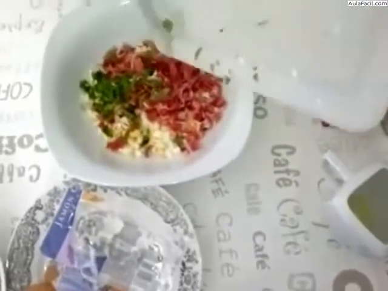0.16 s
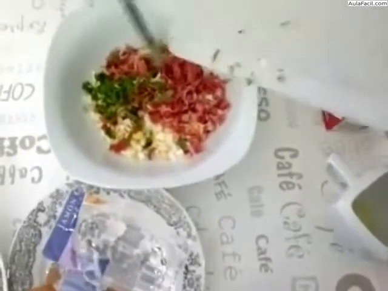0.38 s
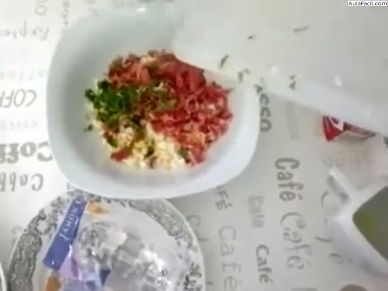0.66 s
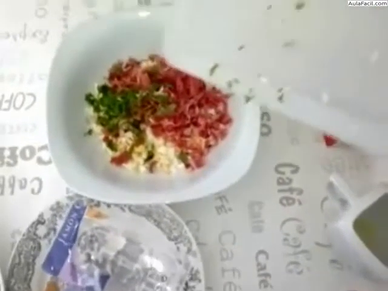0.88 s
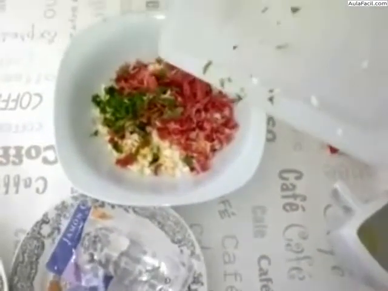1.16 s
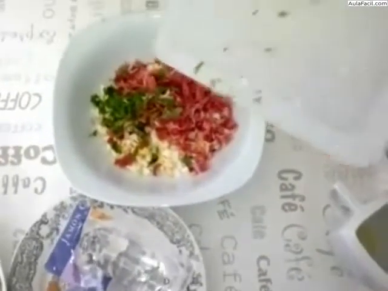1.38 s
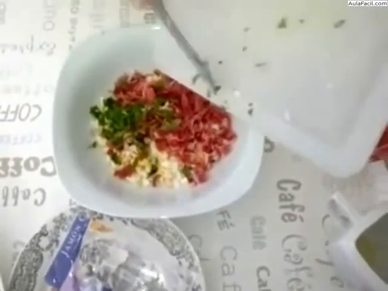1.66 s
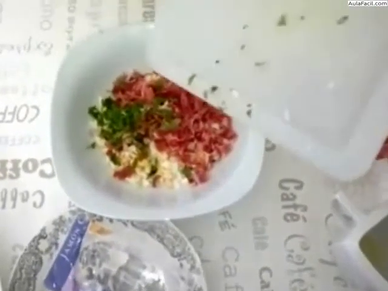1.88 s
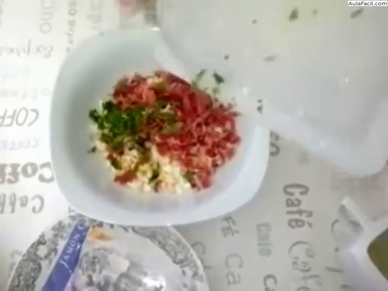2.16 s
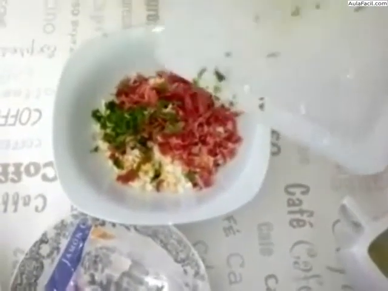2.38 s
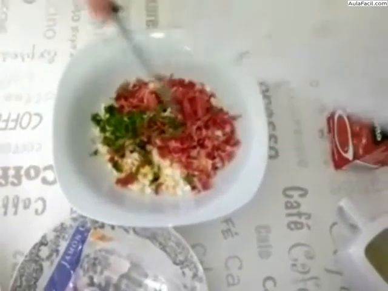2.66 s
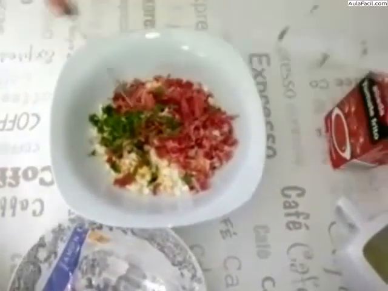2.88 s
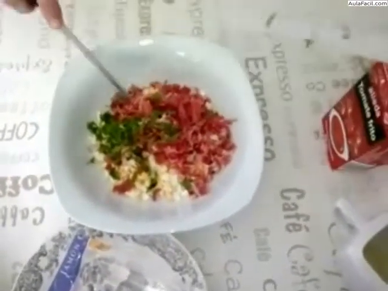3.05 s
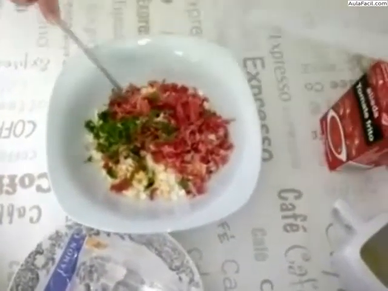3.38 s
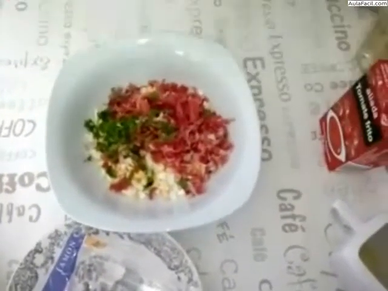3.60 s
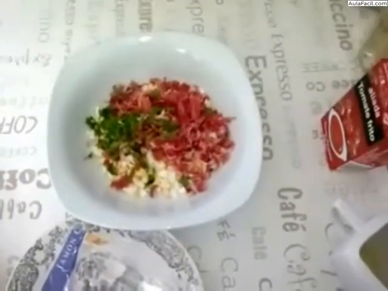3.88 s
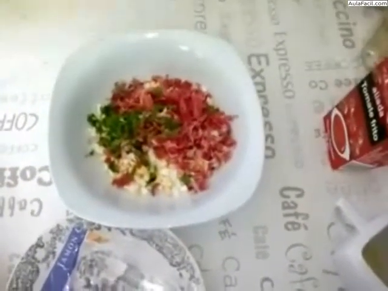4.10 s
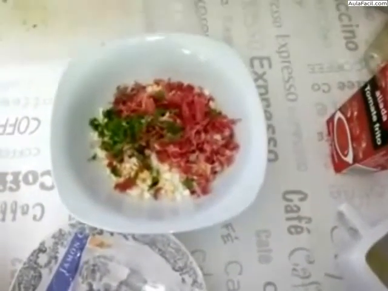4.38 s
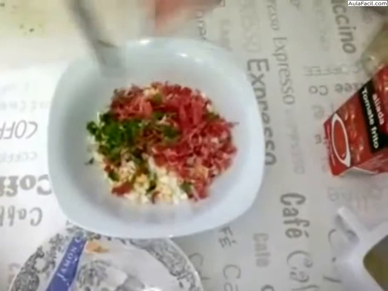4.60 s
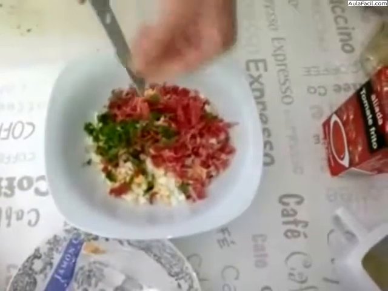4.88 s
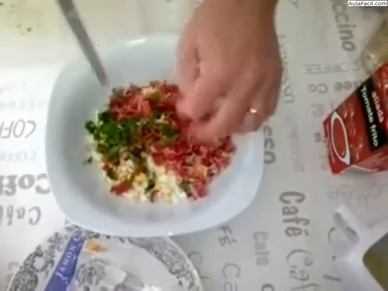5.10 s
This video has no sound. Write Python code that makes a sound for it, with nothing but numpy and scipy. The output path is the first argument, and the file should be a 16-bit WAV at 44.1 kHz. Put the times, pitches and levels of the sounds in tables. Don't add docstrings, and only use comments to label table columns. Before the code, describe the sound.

A knife scrapes a plastic board in eight rough strokes, then the board clatters down among crockery and cutlery in a small kitchen.

```python
import sys
import numpy as np
from scipy import signal
from scipy.fft import rfft, irfft
from scipy.io import wavfile
from scipy.ndimage import uniform_filter1d

SR = 44100
rng = np.random.default_rng(int(sys.argv[2]) if len(sys.argv) > 2 else 0)


def amp(db):
    return 10 ** (np.asarray(db, float) / 20)


def write(x):
    x = np.atleast_2d(x).T
    wavfile.write(sys.argv[1], SR, np.round(np.clip(x, -1, 1) * 32767).astype(np.int16))


N = 231182

# landing in seconds, build-up in seconds, hold in seconds,
# pressure in dB, landing level under that pressure in dB.
STROKES = [
    (0.0, 0.075, 0.014, -22.5, 1),
    (0.428, 0.019, 0.043, -26.5, -8.5),
    (0.763, 0.037, 0.024, -22, -5.5),
    (1.045, 0.007, 0.018, -24, 2.5),
    (1.476, 0.11, 0.15, -22, -10.5),
    (2.011, 0.033, 0.091, -21, -16),
    (2.423, 0.083, 0.073, -18.5, -21.5),
    (2.861, .05, 0.071, -19.5, -16),
    (4.516, .005, 0.01, -30, -2),
]
# drag at landing in dB, then at full speed
# sizzle, hiss and boom in dB above the pressure, lift-off in dB per second.
TRAVEL = [(-8, -18, -10.5, -6.5, 330), (-17, -12.5, -9, -12.5, 390), (-29, -17.5, -10, -14, 300),
          (-13, -18, -10.5, -7, 830), (-17.5, -22, -14, -3, 920), (-38.5, -16, -8, -8, 280),
          (-49, -15.5, -10, -7.5, 330), (-44, -13.5, -7.5, -10.5, 390), (-3.5, -60.5, -26, -3.5, 170)]
LIFT_SHARES = [1.0, 0.33, 0.22, 1]
CURL_DB = [1, -2000, -2200, -2]
# frequency in Hz, width in Hz, level in dB.
BODY_MODES = [(1641, 420, 13.5), (1810, 240, 6), (1180, 90, -9), (2190, 670, -9.5)]
# frequency in Hz, width in Hz, level in dB.
BOOM_MODES = [(240, 180, -4), (334, 70, -6.5), (420, 55, -5.5), (501, 55, 1.5), (613, 81, 7.5),
              (773, 45, 0)]
# frequency in Hz, width in Hz, level in dB.
BLADE_MODES = [(3590, 460, 1.5), (3860, 330, -1), (4760, 360, -6.5), (6050, 200, -7.5), (6580, 210, -7),
               (7330, 430, -5.5), (8430, 270, -15)]
# frequency in Hz, level in dB per Hz.
HISS_COLOUR = [(1410, -9.5), (2400, -7.5), (3700, -5.5), (4100, -6.5), (5310, -13), (5890, -14),
               (7440, -11.5), (9030, -14), (10100, -24), (13200, -61.5), (22000, -120)]


def strokes():
    t = np.arange(N) / SR
    gains = np.zeros((4, N))
    eager = 2.2
    hiss_share, boom_share = 0.5, -0.2
    boom_flat = 0.34
    blade_hz = 1633 + 91 * evened(uniform_filter1d(rng.standard_normal(N), size=1500))
    for press, travel in zip(STROKES, TRAVEL):
        s, build, hold, db, land_db = press
        drag_db, sizzle_db, hiss_db, boom_db, lift = travel
        since = np.maximum(t - s, 0)
        light_db = land_db * np.clip(1 - since / build, 0, 1)
        slow_db = drag_db * np.clip(1 - since / (build + hold), 0, 1) ** eager
        lifted = np.maximum(since - build - hold, 0)
        above_db = [0,
                    hiss_db + hiss_share * slow_db,
                    sizzle_db + slow_db,
                    boom_db + boom_share * slow_db - boom_flat * light_db]
        onset = np.minimum(since / 0.0021, 1)
        for k, share in enumerate(LIFT_SHARES):
            leaving_db = CURL_DB[k] * lifted ** 2 - share * lift * lifted
            gains[k] += onset * amp(db + light_db + above_db[k] + leaving_db)

    slips = grit(per_s=1100, spread_db=2.5)
    body = evened(ring_through(slips, BODY_MODES))
    body += 1.3 * evened(resonate(slips, blade_hz, 460))
    boom = ring_through(slips + 0.65 * grit(per_s=400, spread_db=3.0), BOOM_MODES)
    fine = grit(per_s=9000, spread_db=2.5)
    hiss = evened(colour(fine, HISS_COLOUR))
    hiss += 0.55 * evened(ring_through(fine, BLADE_MODES))
    body = patchy(body, patchy_db=2.5)
    hiss = patchy(hiss, patchy_db=3.5)
    boom = patchy(boom, patchy_db=2.5)
    layers = [band(body, 1000, 2800, order=5),
              band(hiss, 2400, 5100, order=4),
              band(hiss, 5100, 9600, order=4),
              band(boom, 220, 840, order=4)]
    return sum(gain * evened(layer) for gain, layer in zip(gains, layers))


# start in seconds, peak in dB, knock in Hz,
# boom and treble in dB above the peak.
LANDINGS = [
    (0.7627, -12, 1760, -20, -40),
    (1.0395, -9, 1760, -22, -40),
    (1.4795, -20, 1760, -6, -40),
    (2.0103, -17, 1760, -4, -40),
    (2.4274, -19, 1760, -5, -40),
    (4.5186, -23, 1760, -12, -40),
]
# start in seconds, peak in dB, knock in Hz,
# boom and treble in dB above the peak.
CATCHES = [(0.0841, -11.5, 1690, -18, -37.5), (0.4349, -26, 1430, -7, -28),
           (0.7952, -16.5, 1580, -27.5, -29), (0.8166, -11, 1436, -34, -23),
           (1.528, -27, 1550, -0.5, -18.5), (1.6189, -11, 1690, -29, -29), (1.706, -10, 1631, -9, -24.5),
           (2.031, -20.5, 1620, -6, -38), (2.074, -11, 1617, -22, -27.5), (2.096, -10, 1711, -6.5, -31),
           (2.1112, -16, 1559, -3.5, -18), (2.4559, -42, 1656, 7.5, -33.5),
           (2.5316, -10.5, 1633, -5, -25.5), (2.8581, -31, 1745, -5.5, -34),
           (2.8996, -13.5, 1527, -15, -17), (2.938, -7, 1600, -25, -20), (4.5394, -24.5, 1438, -6, -31.5),
           (4.584, -23.5, 1446, 1, -46.5)]


def catches():
    blows = LANDINGS + CATCHES
    out = np.zeros(N)
    chance = rng.standard_normal((len(blows), 304))
    t = np.arange(900) / SR
    knock_s = 0.00055
    for (s, db, hz, boom_db, treble_db), z in zip(blows, chance):
        knock = (t / knock_s) ** 2 * np.exp(-t / knock_s) * np.sin(2 * np.pi * hz * t)
        modes = [ring(f * (1 + 0.14 * r), w * 1.1, d) for (f, w, d), r in zip(BOOM_MODES, z)]
        boom = band(sum(modes), 270, 870, order=3)
        tick = band(z * np.hanning(len(z)), 3000, 5500, order=3)
        for part, part_db in [(knock, db), (boom, db + boom_db - 2.0), (tick, db + treble_db)]:
            add(out, s, amp(part_db) * part / abs(part).max())
    return out


# start in seconds, peak in dB, then plate, bowl and steel in dB above it.
BOUNCES = [
    (3.5177, -4.5, -1, -24.5, -24),
    (3.528, -8, -4, 2.5, -6),
    (3.545, -17.5, -7, -12, -7.5),
    (3.655, -7.5, -2, 1, -6.5),
    (3.7449, -9.5, 5.5, -7.5, -9),
    (3.80, -27, 2, -11.5, -4),
]
# frequency in Hz, level in dB, 60 dB decay in seconds.
PLATE_MODES = [(754, -17.5, 0.28), (1519, -5.5, 0.18), (1550, -2, 0.13), (1610, -1.5, 0.11),
               (1690, -5.5, 0.048), (3538, -10, 0.2)]
# frequency in Hz, level in dB, 60 dB decay in seconds.
BOWL_MODES = [(2120, -3, 0.023), (2147, -1.5, 0.24), (2165, -6.5, 0.21), (3260, -13.5, 0.13),
              (3410, -11, 0.26), (3575, -7, 0.099), (7450, -22, 0.064)]
# frequency in Hz, level in dB, 60 dB decay in seconds.
STEEL_MODES = [(2913, 3.5, 0.3), (3700, -14.5, 0.048), (4353, 1.5, 0.31), (5030, -10, 0.11),
               (5250, -6, 0.23), (5400, -11, 0.19), (6080, -10.5, 0.27), (6860, -10, 0.082),
               (7360, -9.5, 0.12), (8930, -12.5, 0.14)]
# frequency in Hz, level in dB per Hz.
CRASH_COLOUR = [(2300, -12), (4300, -6), (4780, -28), (5250, -5.5), (6100, -10.5), (6500, -26.5),
                (7200, -11.5), (10100, -23)]


def bounces():
    out = np.zeros(N)
    chance = rng.standard_normal((len(BOUNCES), 9000))
    t = np.arange(9000) / SR
    for (s, db, plate_db, bowl_db, steel_db), z in zip(BOUNCES, chance):
        rattle = z * np.exp(-t / 0.0078)
        knock = signal.fftconvolve(rattle, sum(ring(*m) for m in BODY_MODES))
        boom = signal.fftconvolve(rattle, sum(ring(*m) for m in BOOM_MODES))
        crash = colour(z[::-1], [(30, -40), *CRASH_COLOUR, (13000, -90)])
        crash *= np.minimum(t / 0.0042, 1) * np.exp(-t / 0.04)
        parts = [(band(knock, 1000, 3000, order=4), -3),
                 (band(boom, 150, 440, order=3), -10),
                 (crash, steel_db - 3.5)]
        wobble = evened(uniform_filter1d(z, 350, mode="wrap"))
        for modes, ring_db in [(PLATE_MODES, plate_db), (BOWL_MODES, bowl_db), (STEEL_MODES, steel_db)]:
            tones = np.zeros(9000)
            for f, d, t60 in modes:
                flutter = amp(5.5 * np.roll(wobble, round(f)))
                tones += flutter * ring(f, 2.8 / t60, d, size=9000)
            parts.append((np.minimum(t / 0.005, 1) * tones, ring_db))
        for part, part_db in parts:
            add(out, s, amp(db + part_db) * part / abs(part).max())
    return out


# start in seconds, length in seconds, level in
# dB, centre in Hz, width in Hz.
BRUSHES = [(1.028, 0.011, -43.5, 1808, 750), (1.282, 0.048, -69.5, 5300, 1800),
           (1.468, 0.021, -54, 1800, 1600), (3.507, .014, -46.5, 2990, 4800),
           (4.094, 0.18, -76, 331.6, 270), (4.151, 0.17, -70, 502, 20), (4.428, 0.037, -62.5, 1950, 300),
           (2, 0.088, -66, 3300, 280), (5.056, 0.094, -56.5, 1894, 590)]


def brushes():
    out = np.zeros(N)
    for s, length, db, hz, width in BRUSHES:
        noise = rng.standard_normal(20000)
        rub = band(noise, max(hz - width / 2, 30), hz + width / 2, order=2)
        rub = rub[9000:][:round(length * SR)]
        add(out, s, amp(db + 2.0) * evened(rub) * np.hanning(len(rub)))
    return out


# frequency in Hz, 60 dB decay in seconds.
KITCHEN_DECAY = [(200, 0.077), (600, 0.33), (1600, 0.27), (3000, 0.28), (9000, 0.17)]


def kitchen(x):
    taps = np.zeros(SR)
    at = np.arange(200, SR - 20, 20) + rng.integers(0, 20, (SR - 201) // 20)
    taps[at] = rng.choice([-1., 1.], len(at))
    hz, t, z = signal.stft(taps, SR, nperseg=256)
    decay = amp(-60 * t / read(KITCHEN_DECAY, hz)[:, None])
    tail = signal.istft(z * decay, SR, nperseg=256)[1]
    return signal.fftconvolve(x, tail / np.linalg.norm(tail))[:N]


# peak in seconds, then rumble, upper rumble and table-top ring in dB.
JOLTS = [(.04, -44.5, -46, -44), (0.118, -63, -59.5, -55), (0.261, -74.5, -69.5, -58.5),
         (.45, -66, -59.5, -54.5), (.79, -58.5, -60.5, -52.5), (0.929, -66, -63.5, -50.5),
         (1.059, -47.5, -51.5, -44.5), (1.21, -59, -61.5, -51), (1.52, -39.5, -46.5, -55.5),
         (1.648, -52.5, -42.5, -42), (1.708, -56.5, -42.5, -45.5), (1.92, -58, -67, -52.5),
         (2.032, -50, -51.5, -48.5), (2.151, -60, -52.5, -52), (2.43, -53, -50, -47),
         (2.52, -48.5, -48.5, -45.5), (2.622, -52, -53, -49), (2.89, -55, -50, -47.5),
         (2.991, -48.5, -50.5, -47.5), (3.16, -70, -64, -56), (3.4, -67.5, -65, -53.5),
         (3.522, -43.5, -42.5, -39.5), (3.66, -40, -39, -41.5), (3.751, -49, -34.5, -47),
         (4.16, -77.5, -73, -63), (4.542, -34.5, -41.5, -40.5), (4.66, -47.5, -44, -44.5),
         (4.8, -49, -62, -48.5), (4.929, -44.5, -55, -52.5), (5.058, -56.5, -57, -48)]
JOLT_RISE = [660, 280, 300]
JOLT_FALL = [160, 180, 130]
JOLT_REST_DB = [-78, -78.5, -71]


def shaking(part):
    jolts = np.array(JOLTS)
    at = np.arange(0, N + 256, 256)
    late = at[:, None] / SR - jolts[:, 0]
    slope = np.where(late < 0, JOLT_RISE[part], -JOLT_FALL[part])
    db = jolts[:, part + 1] + slope * late
    gain = np.sqrt((amp(db) ** 2).sum(1) + amp(JOLT_REST_DB[part]) ** 2)
    return np.interp(np.arange(N), at, gain)


# frequency in Hz, level in dB per Hz.
AIR_COLOUR = [(30, -24), (100, -24.5), (200, -16), (450, -13.5), (700, -18), (1000, -21), (1350, -12.5),
              (1900, -12.5), (2500, -19.5), (3200, -30.5), (8500, -36), (10100, -61)]
# time in seconds, level in dB.
AIR_LEVEL = [(0, -66), (1.2, -62), (1.45, -65.5), (2.4, -65), (3.45, -65.5), (4.05, -69), (4.35, -66.5),
             (4.5, -67), (4.9, -62.5), (5.24, -63.5)]


def background():
    a, b, c, d, e = rng.standard_normal((5, N))
    t = np.arange(N) / SR
    air = patchy(colour(a, AIR_COLOUR), patchy_db=2.0)
    air *= amp(curve(AIR_LEVEL, 1)) / np.std(band(air, 900, 2700))
    waver = np.cumsum(3.4 * evened(uniform_filter1d(b, 3000))) / SR
    hum = shaking(part=2) * np.sin(2 * np.pi * (135.6 * t + waver))
    whine_db = -79.5 + 6.6 * evened(uniform_filter1d(c, 8000))
    whine = amp(whine_db) * np.sin(2 * np.pi * 500.6 * t)
    low = shaking(part=0) * evened(band(d, 30, 87, order=3))
    upper = shaking(part=1) * evened(band(e, 110, 290, order=3))
    return air + hum + whine + low + upper


def grit(per_s, spread_db):
    size = amp(spread_db * np.minimum(rng.exponential(1, N), 4)) * rng.choice([-1., 1.], N)
    return evened(size * (rng.random(N) < per_s / SR))


def ring(hz, width, db, size=1500):
    t = np.arange(size) / SR
    return amp(db) * np.exp(-np.pi * width * t) * np.sin(2 * np.pi * hz * t)


def ring_through(x, modes):
    return signal.oaconvolve(x, sum(ring(*m) for m in modes))[:N]


def resonate(x, hz, width):
    turn = np.exp(2j * np.pi * np.cumsum(hz) / SR)
    r = np.exp(-np.pi * width / SR)
    return 2 * (turn * signal.lfilter([1 - r], [1, -r], x / turn)).real


def patchy(x, patchy_db):
    z = signal.stft(x, nperseg=256)[2]
    patches = uniform_filter1d(rng.standard_normal(z.shape), size=3, axis=0)
    patches = uniform_filter1d(patches, size=9, axis=1)
    return signal.istft(z * amp(patchy_db * evened(patches)), nperseg=256)[1][:N]


def colour(x, points):
    hz = np.fft.rfftfreq(len(x), 1 / SR)
    return irfft(rfft(x) * amp(read(points, hz)), len(x))


def band(x, lo_hz, hi_hz, order=2):
    return signal.sosfilt(signal.butter(order, [lo_hz, hi_hz], "bandpass", fs=SR, output="sos"), x)


def evened(x):
    return x / np.sqrt(np.mean(x ** 2) + 1e-20)


def read(points, hz):
    f, value = np.transpose(points)
    return np.interp(np.log(hz + 1), np.log(f + 1), value)


def curve(rows, column):
    rows = np.array(rows)
    return np.interp(np.arange(N) / SR, rows[:, 0], rows[:, column])


def add(mix, s, sound):
    part = mix[round(s * SR):][:len(sound)]
    part += sound[:len(part)]


def scene():
    near = amp(-3.0) * strokes() + catches() + bounces() + brushes()
    return (near + amp(-6.0) * kitchen(near) + background())[None]


def band_limit(x):
    return signal.sosfilt(signal.butter(12, 10270, fs=SR, output="sos"), x)


def record(dry):
    edge = signal.firwin(401, 10160, window=("kaiser", 9), fs=SR)
    rounded = 0.79 * np.tanh(dry / 0.77)
    limited = signal.oaconvolve(rounded, edge[None], "same")
    hz, _, z = signal.stft(limited, SR, nperseg=1024, noverlap=512)
    bands_db = 10 * np.log10(uniform_filter1d(abs(z) ** 2, size=9, axis=1) + 1e-20)
    masked = (bands_db < bands_db.max(1, keepdims=True) - 45) & (hz[:, None] > 2600)
    mix = signal.istft(z * ~masked, SR, nperseg=1024, noverlap=512)[1][:, :N]
    return band_limit(mix)


dry = scene()
out = record(dry)
write(out)
```